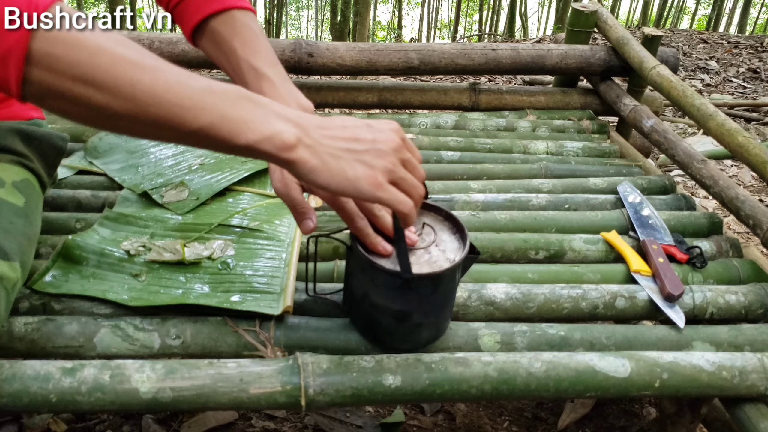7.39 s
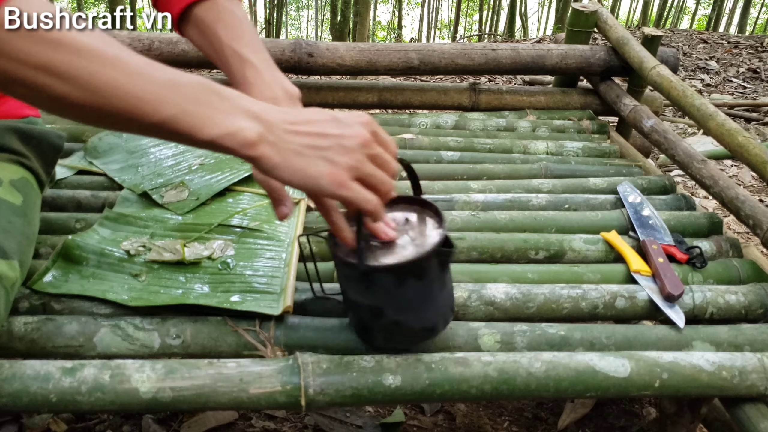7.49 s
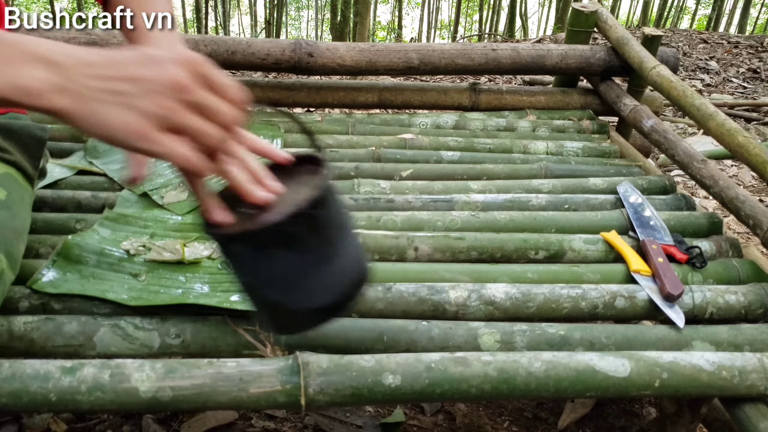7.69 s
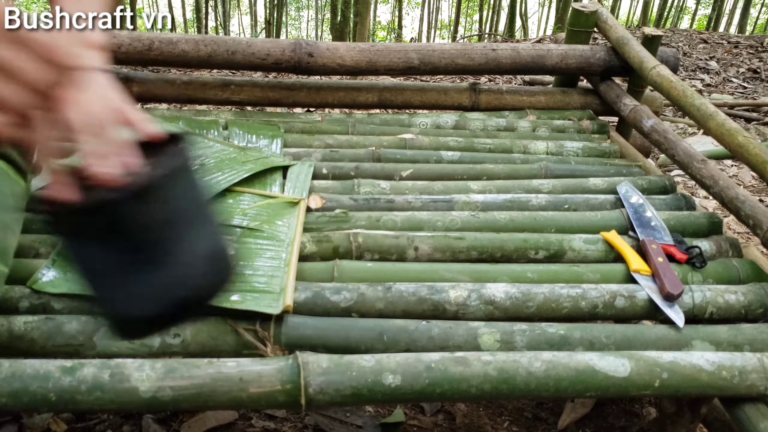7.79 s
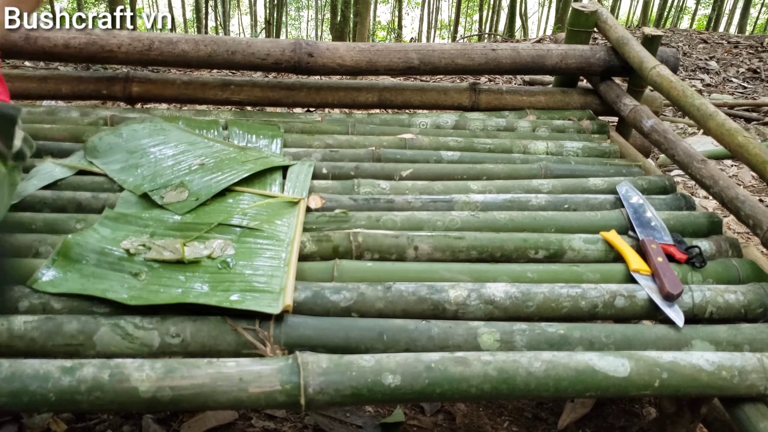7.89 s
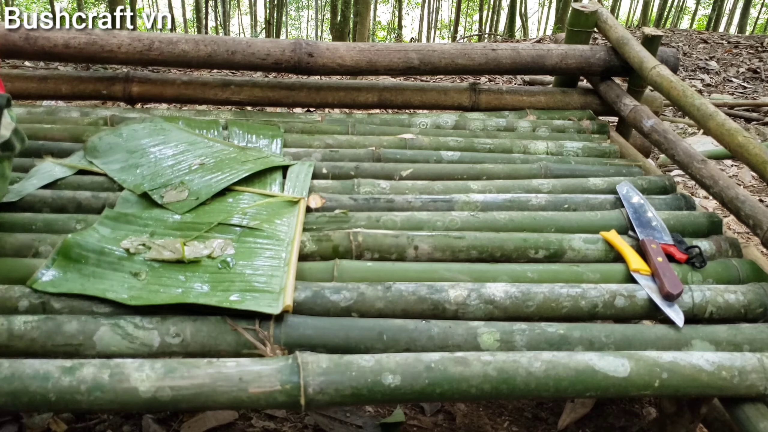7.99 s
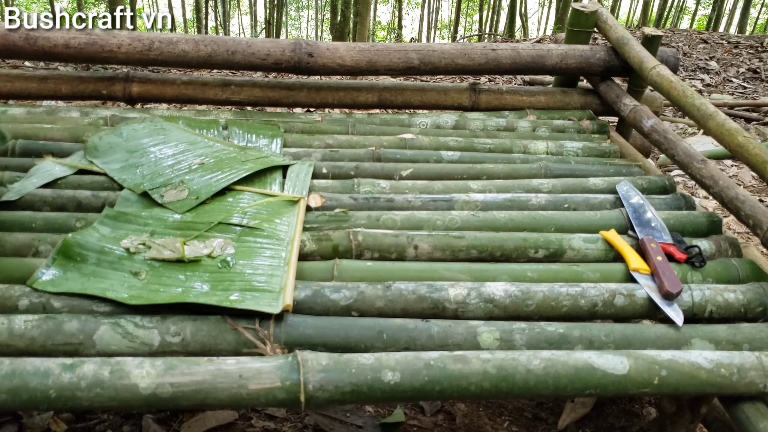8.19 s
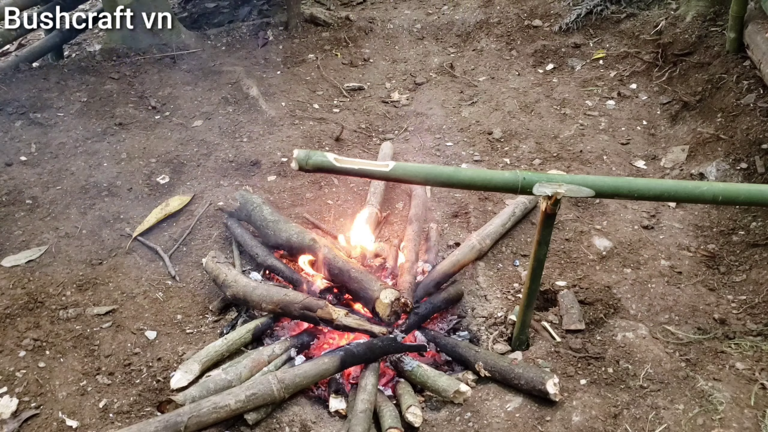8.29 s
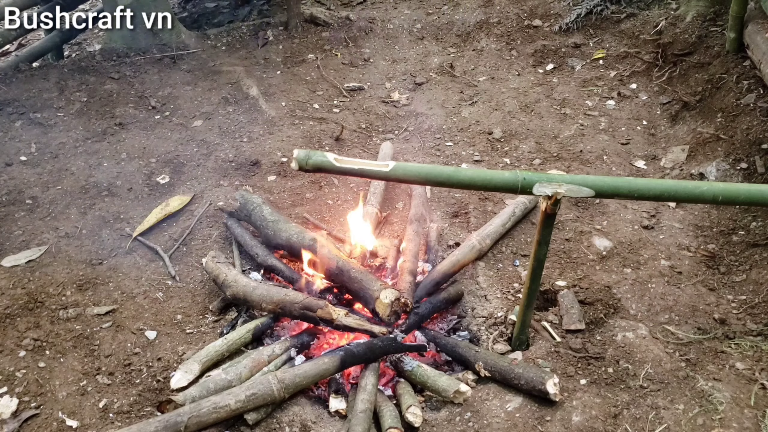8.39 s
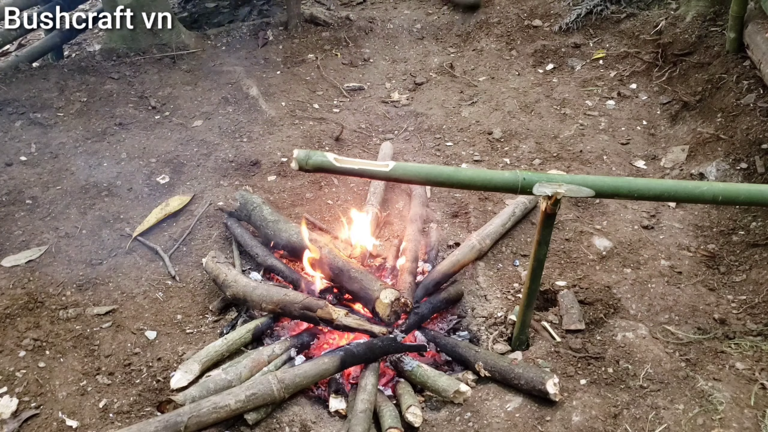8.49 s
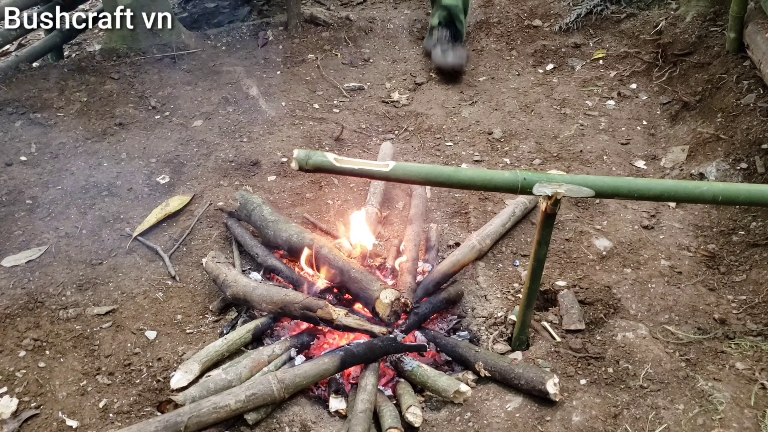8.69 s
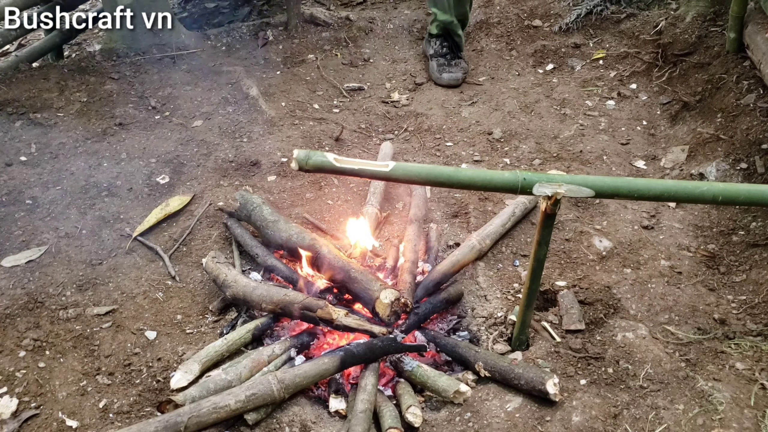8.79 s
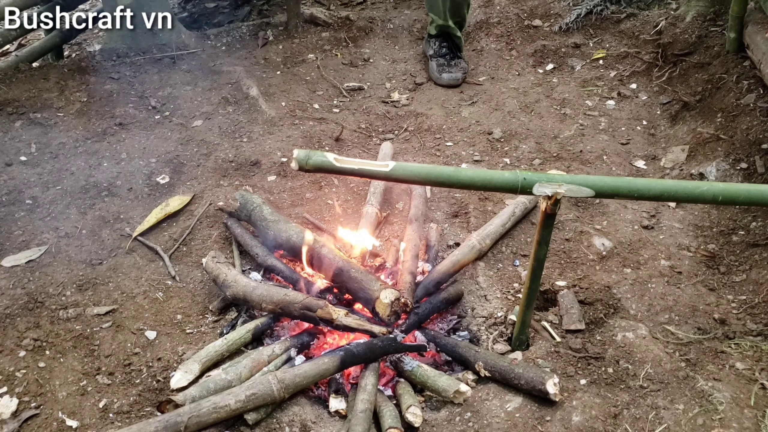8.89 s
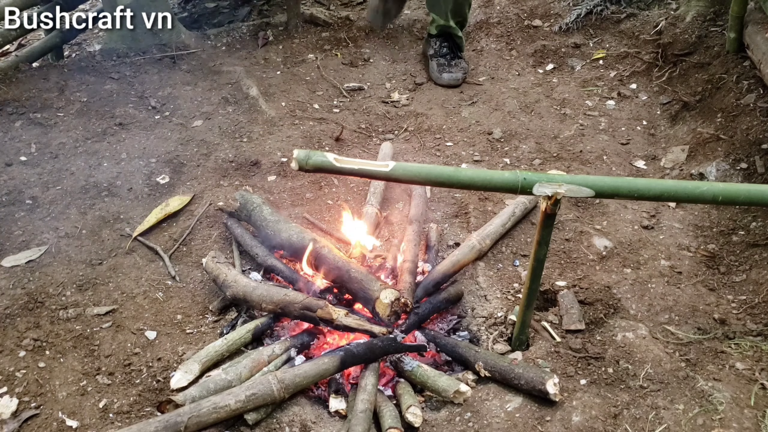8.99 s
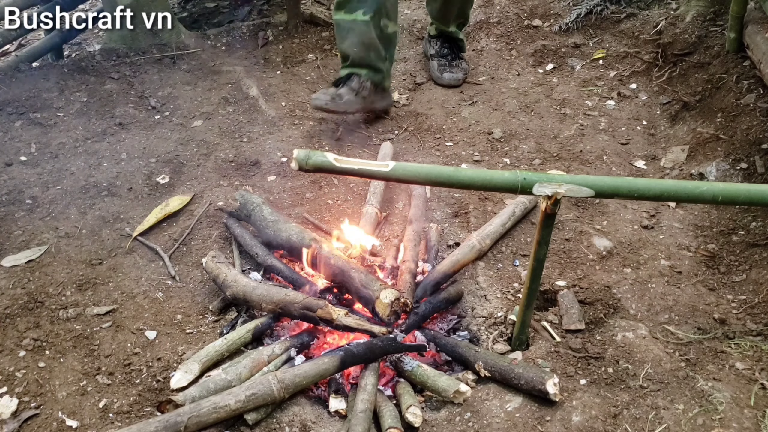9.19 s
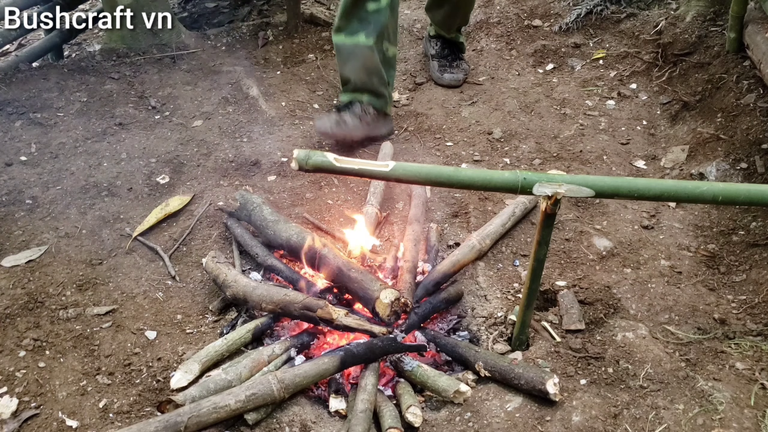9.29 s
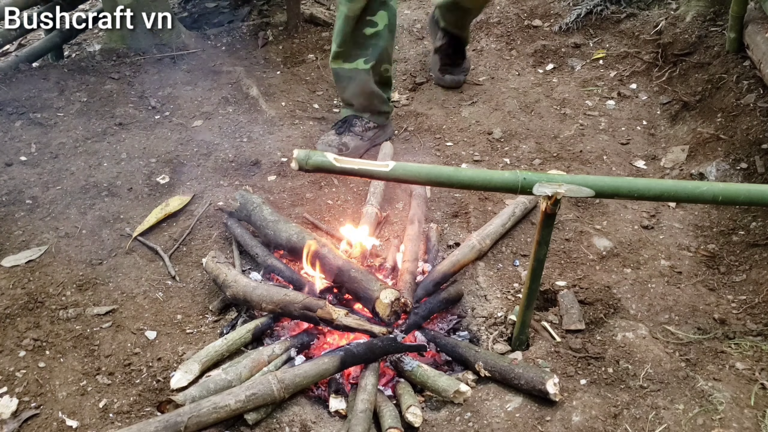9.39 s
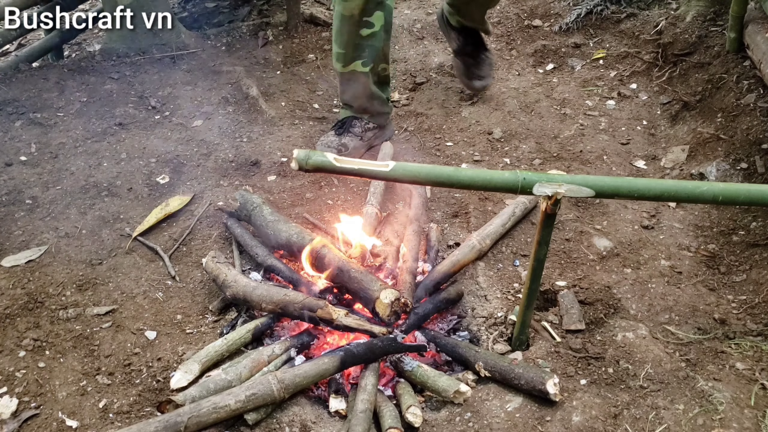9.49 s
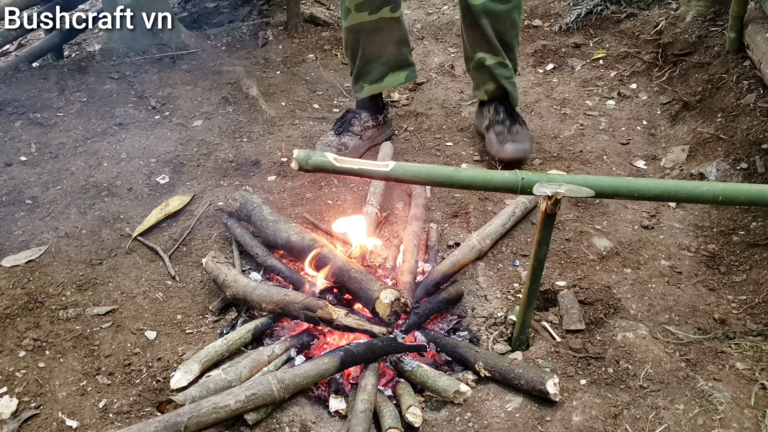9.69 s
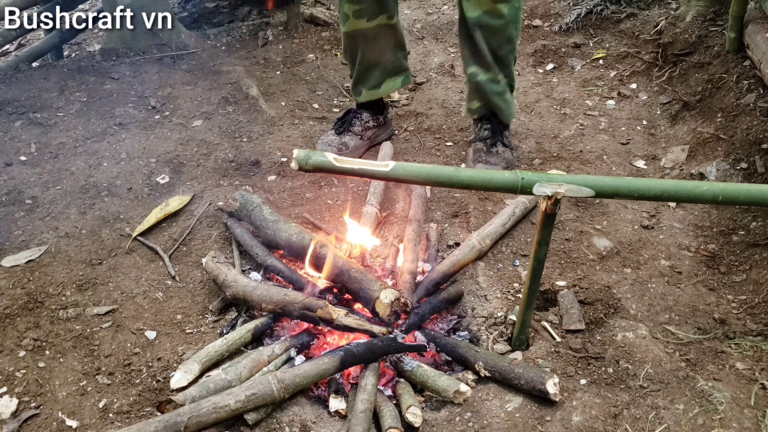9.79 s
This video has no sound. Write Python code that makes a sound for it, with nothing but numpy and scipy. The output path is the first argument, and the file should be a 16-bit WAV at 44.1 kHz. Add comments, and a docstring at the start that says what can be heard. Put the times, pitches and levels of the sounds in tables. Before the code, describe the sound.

In a bamboo forest, cicadas drone steadily above a soft far rumble, with a faint high katydid pulsing in bouts. Near the microphone a metal pot is knocked almost at once, then small dry ticks follow. A sharp lid clack comes near the middle, more handling knocks as the pot is lifted, then strong fire snaps. Birds farther off whistle, trill, rasp and finally coo, echoing among trunks.

```python
"""Cicadas drone over a far low rumble while a small fire snaps and ticks at a camp in a bamboo forest.
A metal pot and its lid are knocked; a katydid pulses high up; birds whistle, trill, rasp and coo.
Air and insects are filtered noise, birds are gliding sines with overtones, fire is decaying noise bursts,
and pot and lid are sums of decaying modes. Fire, metal and birds sound among echoing trunks."""
import sys
import numpy as np
from scipy import signal
from scipy.io import wavfile

SR = 44100
rng = np.random.default_rng(int(sys.argv[2]) if len(sys.argv) > 2 else 0)


def log_audio(samples):
    """Write samples as a 16-bit WAV file to the path given in sys.argv[1]."""
    # one column per channel
    frames = np.atleast_2d(samples).T
    # limit to full scale, then quantise
    limited = np.clip(frames, -1, 1)
    pcm = np.round(limited * 32767).astype(np.int16)
    wavfile.write(sys.argv[1], SR, pcm)


def rack_gain(trim_db):
    """Turn a fader trim in dB into the linear factor to multiply a signal by."""
    fader = np.asarray(trim_db, float)
    return 10 ** (fader / 20)


N = 433944
T = np.arange(N) / SR


def rms_one(x):
    """Normalization: scale to unit root-mean-square."""
    return x / np.sqrt(np.mean(x ** 2) + 1e-20)


def drift(rate):
    """Random modulation: straight lines join normal values of spread 1, drawn rate times per second."""
    knots = rng.standard_normal(1200)
    return np.interp(T * rate, np.arange(1200), knots)


def panned(left_right_db):
    """Interaural level difference: half the decibels up on the left, half down on the right."""
    return rack_gain([[left_right_db / 2], [-left_right_db / 2]])


def resonance(x, hz, width_hz):
    """Resonance: a two-pole filter with gain 1 on top."""
    r = np.exp(-np.pi * width_hz / SR)
    zeros = [(1 - r * r) / 2, 0, (r * r - 1) / 2]
    poles = [1, -2 * r * np.cos(2 * np.pi * hz / SR), r * r]
    return signal.lfilter(zeros, poles, x + 1e-18)


def along_log_hz(log_hz, curve):
    """Spectral interpolation: read a curve of (Hz, value) on a logarithmic frequency axis."""
    return np.interp(log_hz, np.log([p[0] for p in curve]), [p[1] for p in curve])


def coloured(white, spectrum, likeness=None, patchy_db=0):
    """Spectral shaping: weighted bands of two noises; a partly coherent pair when likeness is given."""
    edges = 22 * 2 ** np.arange(0, 9.7, .4)   # bands 0.4 octave wide
    out = 0
    for k, (low, high) in enumerate(zip(edges, edges[1:])):
        centre = np.log(low * high) / 2
        gain = rack_gain(along_log_hz(centre, spectrum))
        band_filter = signal.butter(2, [low, high], "band", fs=SR, output="sos")
        band = signal.sosfilt(band_filter, white[k % 2])   # neighbours use different noises
        if likeness:
            alike = along_log_hz(centre, likeness)
            shared = np.sqrt(1 + alike) * band[0]
            opposed = np.sqrt(1 - alike) * band[1] * [[1], [-1]]
            band = shared + opposed
            gain = gain * rack_gain(patchy_db * drift(9))
        out = out + gain * band
    return out


def add(out, s, sound):
    """Superposition: sum a sound in from a start time in seconds."""
    i = round(s * SR)
    out[..., i:i + sound.shape[-1]] += sound[..., :N - i]


def among_trunks(x, lag, t60, early_db, tail_db):
    """Reverberation: direct sound (left late by lag samples), hard trunk echoes and a diffuse tail."""
    t = np.arange(SR // 2) / SR
    tail = rng.standard_normal((2, len(t))) * rack_gain(-60 * t / t60) * np.clip(t / 0.0016, 0, 1)
    response = rack_gain(tail_db) * tail / np.sqrt(np.sum(tail ** 2, axis=1, keepdims=True))
    response[0, lag] = response[1, 0] = 1
    for lag_s, echo_db in [(.014, 5), (.029, -4), (.05, -2)]:
        delays = (SR * lag_s * rng.uniform(.8, 1.2, 2)).astype(int)   # other delays in each ear
        response[[0, 1], delays] += rack_gain(early_db + echo_db)
    return signal.fftconvolve(x * np.ones((2, 1)), response, axes=1)[:, :N]


# spectrum of the air and far rumble: pitch_hz [Hz], density_db [relative dB per Hz]
AIR_SPECTRUM = [(18, -46), (30, -11.5), (75, -1.5), (174, -2.5), (473, -4.5), (800, -12.5), (1390, -23),
                (3000, -19), (4200, -22), (6050, -24), (9000, -23.5), (14800, -27), (16000, -33)]
# correlation of the two ears: pitch_hz [Hz], likeness [-1 to 1]
AIR_LIKENESS = [(60, 0.94), (130, 0.94), (290, 0.75), (640, 0.0045), (1400, -0.27), (3000, -0.054),
                (15000, 0.0046)]
AIR_LEVEL_DB = -47.5


def air():
    """Diffuse field: the coherence of the ears depends on frequency, and each band's level drifts."""
    white = rng.standard_normal((2, 2, N))
    noise = coloured(white, AIR_SPECTRUM, AIR_LIKENESS, patchy_db=1.9)
    return rack_gain(AIR_LEVEL_DB) * rms_one(noise) * panned(.6)


# drone level before a 5 dB lift: time_s [s], level_db [dB]
CICADA_LEVELS = [(0.0, -56), (5.84, -56.5), (9.84, -56)]
# resonances of the tymbal: pitch_hz [Hz], width_hz [Hz], level_db [relative dB]
TYMBAL_MODES = [(4680, 270, 1.5), (4924, 300, 1), (5215, 310, -4)]


def cicadas():
    """Resonant excitation: one near tymbal clicks in fours; a far chorus is steady noise on its modes."""
    beat = 26.7 * T + 0.056 * drift(1.7)   # groups of four, counted
    clicks = np.cos(4 * np.pi * beat) ** 6
    grouping = 0.078 + np.cos(np.pi * beat) ** 2
    pulsing = 1 + 1.15 * clicks * grouping
    song = 0
    for hz, width_hz, db in TYMBAL_MODES:
        excitation = pulsing * rng.standard_normal((2, N))   # each mode has noise of its own
        once = resonance(excitation, hz, width_hz)
        song = song + rack_gain(db) * resonance(once, hz, width_hz)
    level_db = np.interp(T, *np.transpose(CICADA_LEVELS)) + 5.0 + 0.71 * drift(4.16)
    return rms_one(song) * rack_gain(level_db) * panned(1.4)


# bouts of the katydid: first_pulse_s [s], end_s [s], period_s [s]
KATYDID_BOUTS = [(-.015, 2.1, 0.247), (3.99, 6.3, 0.2396), (7.93, 9.84, .239)]


def katydid():
    """Amplitude modulation: even pulses gate noise in a narrow high band."""
    gate = 0
    for s, end, period in KATYDID_BOUTS:
        in_bout = (T > s - period / 2) & (T < end)
        gate = gate + in_bout * np.abs(np.cos(np.pi * (T - s) / period)) ** 1.7
    once = resonance(rng.standard_normal((2, N)), 8500, 330)
    hiss = resonance(once, 8500, 330)
    return rack_gain(-62) * rms_one(hiss) * gate


def sweep(length_s, from_hz, to_hz, overtone_db):
    """Frequency modulation: a swelling, quavering climb; low voices reach their top early, then sag."""
    u = np.linspace(0, 1, int(length_s * SR))
    quaver = np.interp(u, np.linspace(0, 1, 14), rng.standard_normal(14))
    low = to_hz < 2500
    hz = to_hz - (to_hz - from_hz) * (1 - u) ** (4.0 if low else 1.35) - low * 90 * u ** 3
    phase = 2 * np.pi * np.cumsum(hz * (1 + 0.02 * quaver)) / SR
    ends = np.minimum(1, np.minimum(u / .15, (1 - u) / .2))
    swell = rack_gain(-20 * np.log2(max(from_hz, to_hz) / hz) + 4.5 * quaver) * ends   # louder near the top
    overtone = rack_gain(overtone_db + 1.2 * quaver) * np.sin(np.pi * u ** 0.36) ** 2
    return np.sqrt(2) * (swell * np.sin(phase) + overtone * np.sin(2 * phase))


# a low coo: start_s [s], length_s [s], pitch_hz [Hz], level_db [dB]
COO_NOTES = [(9.141, 0.12, 666, -55), (9.35, 0.126, 672, -59), (9.57, 0.158, 651, -62)]


def coos(out):
    """Drooping pitch: low notes start slightly flat, then sag, with an octave overtone."""
    for s, length_s, hz, db in COO_NOTES:
        add(out, s, rack_gain(db) * sweep(length_s, .98 * hz, hz, overtone_db=-8.0))


# hoarse rasps: start_s [s], length_s [s], level_db [dB]
RASP_NOTES = [(.255, 0.086, -56.5), (2.2, 0.21, -63.5), (3.8, 0.25, -61.5), (5.63, 0.26, -59.5),
              (8.07, 0.095, -53.5), (9.15, 0.23, -61)]
RASP_HZ, RASP_OVERTONE_DB = 1929, 11   # mean pitch; octave overtone over fundamental
WHISTLE_RASP_S, WHISTLE_RASP_DB = 0.035, -6   # rasp level over whistle plus hoarseness


def rasps(out):
    """Sideband spreading: fast pitch shaking blurs a tone into noise, throbbing in level."""
    shake = drift(115) + np.sin(2 * np.pi * 120 * T)
    throb = np.abs(np.sin(np.pi * 17 * T)) + 0.075
    in_whistles = [(s, WHISTLE_RASP_S, db + hoarse_db + WHISTLE_RASP_DB)
                   for s, length_s, hz, db, hoarse_db in WHISTLE_NOTES]
    for s, length_s, db in RASP_NOTES + in_whistles:
        i, u = round(s * SR), np.linspace(0, 1, int(length_s * SR))
        now = slice(i, i + len(u))
        phase = 2 * np.pi * np.cumsum(RASP_HZ * (1 + .11 * shake[now])) / SR
        shape = np.minimum(1, np.minimum(u / 0.02, (1 - u) / 0.21)) * throb[now]
        tone = np.sin(phase) + rack_gain(RASP_OVERTONE_DB) * np.sin(2 * phase)
        add(out, s, rack_gain(db) * shape * tone)


# trills of quick rising sweeps: start_s [s], top_hz [Hz], level_db [dB], sweep_rate [per s]
TRILL_NOTES = [(1.361, 3170, -49, 47.6), (2.044, 3084, -47, 52), (2.713, 3140, -44.5, 37.6),
               (3.203, 3655, -49, 84), (3.395, 3730, -51, 48), (5.307, 3114, -52.5, 49),
               (7.582, 3390, -45, 49), (8.73, 3160, -51.5, 89)]
TRILL_STARTS_S = .055   # sweeps begin within this time
TRILL_RISE_HZ, TRILL_CLIMB_HZ_PER_S = 552, 21500   # slower sweeps climb further


def trills(out):
    """Repeated frequency modulation: overlapping upward sweeps, each uneven in level and top pitch."""
    for s, to_hz, db, per_s in TRILL_NOTES:
        from_hz = to_hz - TRILL_RISE_HZ - TRILL_CLIMB_HZ_PER_S / per_s
        for start in np.arange(s, s + TRILL_STARTS_S, 1 / per_s):
            uneven = rng.standard_normal(2)
            top_hz = to_hz * (1 + 0.0376 * uneven[1])
            note = sweep(1.6 / per_s, from_hz, top_hz, CLEAR_DB)
            add(out, start, rack_gain(db + 2.6 * uneven[0]) * note)


# climbing whistles, mostly long, with a rasp that grows with hoarseness; clear ones have practically none:
# start_s [s], length_s [s], top_hz [Hz], level_db [dB], hoarseness_db [octave overtone, dB]
WHISTLE_NOTES = [(0.911, 0.073, 3510, -41, -12), (1.578, 0.07, 3560, -39.5, -5.5),
                 (4.877, 0.074, 3540, -39.5, -6), (6.847, 0.054, 3600, -40.5, -32),
                 (7.944, 0.075, 3550, -45.5, 0.5), (8.974, 0.05, 3270, -43.5, -11),
                 (9.233, 0.028, 2720, -52.5, -1.5), (9.686, 0.083, 3620, -39.5, -7)]
# level pips: start_s [s], length_s [s], pitch_hz [Hz], level_db [dB]
PIP_NOTES = [(0, 0.012, 2694, -53.5), (0.231, 0.024, 2660, -55), (1.258, 0.016, 2660, -62.5),
             (4.216, 0.016, 2735, -58), (4.421, 0.048, 2720, -58.5), (5.11, 0.014, 2650, -54),
             (5.449, 0.028, 2640, -62), (6.081, 0.026, 2617, -51.5), (6.593, 0.033, 2430, -57.5),
             (6.881, 0.052, 3000, -47), (7.121, 0.034, 2784, -54), (7.807, 0.027, 2660, -58.5),
             (8.014, 0.042, 2725, -55), (8.355, 0.03, 2650, -52), (8.687, 0.075, 2820, -58),
             (9.076, 0.028, 2220, -59.5), (9.345, 0.028, 3020, -57.5), (9.446, 0.033, 2220, -64)]
# quick upward flicks, mostly ending a pip: start_s [s], length_s [s], top_hz [Hz], level_db [dB]
FLICK_NOTES = [(0.022, 0.018, 3310, -55), (0.292, 0.03, 3460, -50), (3.795, 0.035, 2890, -52.5),
               (4.226, 0.024, 3220, -57), (4.462, 0.0265, 3280, -52), (5.132, 0.016, 3160, -51),
               (5.844, 0.034, 3190, -49), (6.618, 0.019, 2900, -52.5), (7.145, 0.0212, 3150, -46),
               (7.295, 0.041, 2930, -56.5), (8.384, 0.021, 3180, -47), (9.089, 0.015, 3080, -48),
               (9.16, 0.036, 3010, -53)]
# arched notes of a lower voice:
# start_s [s], length_s [s], top_hz [Hz], level_db [dB], overtone_db [octave overtone, dB]
ARCH_NOTES = [(3.455, 0.11, 2420, -65.5, -4), (6.156, 0.1, 2393, -60.5, 11),
              (6.235, 0.072, 2230, -57.5, 11.5), (6.358, 0.057, 2175, -58, 7.5),
              (8.067, 0.057, 2465, -55.5, 12), (8.883, 0.047, 2280, -62, -15)]
WHISTLE_START_HZ, FLICK_RISE_HZ, ARCH_RISE_HZ = 1577, 566, 700
CLEAR_DB = -30   # octave overtone of a clear note


def whistles(out):
    """Gliding tones: whistles, pips, flicks and arches differ in climb and in overtone strength."""
    for s, length_s, top_hz, db, hoarse_db in WHISTLE_NOTES:
        add(out, s, rack_gain(db) * sweep(length_s, WHISTLE_START_HZ, top_hz, hoarse_db))
    for s, length_s, hz, db in PIP_NOTES:
        add(out, s, rack_gain(db) * sweep(length_s, hz, hz, CLEAR_DB))
    for s, length_s, top_hz, db in FLICK_NOTES:
        add(out, s, rack_gain(db) * sweep(length_s, top_hz - FLICK_RISE_HZ, top_hz, CLEAR_DB))
    for s, length_s, top_hz, db, overtone_db in ARCH_NOTES:
        add(out, s, rack_gain(db) * sweep(length_s, top_hz - ARCH_RISE_HZ, top_hz, overtone_db))


def birds():
    """Source and filter: all voices pass a throat that lets little through above 4500 Hz."""
    out = np.zeros(N)
    for voice in (whistles, trills, rasps, coos):
        voice(out)
    return signal.sosfilt(signal.butter(6, 4500, fs=SR, output="sos"), out)


# spectrum of a crack: pitch_hz [Hz], density_db [relative dB per Hz]
CRACK_SPECTRUM = [(1500, -12.5), (3500, -1.5), (6000, -5), (8000, -2), (10500, -0.5), (13000, -3),
                  (15000, 0.5)]
# resonance of a woody knock: pitch_hz [Hz], width_hz [Hz]
KNOCK_RESONANCE = (1800, 400)


def crack_and_knock():
    """Noise excitation: spluttering noise is shaped into a bright hiss and a resonant knock."""
    steady = rng.standard_normal((3, N))
    splutter = rack_gain(3 * rng.standard_normal(N // 30 + 1).repeat(30)[:N])
    white = steady * splutter
    hiss = coloured(white, CRACK_SPECTRUM)
    knock = resonance(white[2], *KNOCK_RESONANCE)
    return rms_one(hiss), rms_one(knock)


# rubs and rustles that last a moment:
# start_s [s], length_s [s], crack_db [dB], knock_db [dB], swell_db [dB gained over the length]
RUB_EVENTS = [(0.461, 0.041, -35, -38.5, 3), (0.606, 0.015, -46.5, -48.5, 0.5),
              (2.364, 0.036, -51, -72, -9), (2.635, 0.1, -58, -72, -3), (3.766, 0.074, -56, -66, 4.5),
              (3.881, 0.015, -32.5, -50, -5), (7.674, 0.026, -35.5, -45, -8.5),
              (8.139, 0.0078, -27, -55, 1)]


def rubs(hiss, knock):
    """Sustained friction: held noise wakes the lid's modes, then stops abruptly."""
    out, t = np.zeros((2, N)), np.arange(SR // 4) / SR
    ringing = sum(resonance(hiss, hz, 57) for hz, db, t60 in LID_MODES)
    chatter = rms_one(hiss + 2.0 * ringing)
    for s, length_s, crack_db, knock_db, swell_db in RUB_EVENTS:
        now = slice(round(s * SR), round(s * SR) + len(t))
        envelope_db = swell_db * np.minimum(t / length_s, 1) - 1200 * np.maximum(t - length_s, 0)
        envelope = rack_gain(envelope_db) * np.minimum(t / 0.0044, 1)
        rub = rack_gain(crack_db) * chatter[now] + rack_gain(knock_db) * knock[now]
        add(out, s, envelope * panned(3) * rub)
    return out


# snaps of the fire and knocks on the pot (crack and knock are then lowered 3.5 dB):
# start_s [s], crack_db [dB], knock_db [dB], thump_db [dB], left_right_db [dB]
SNAP_EVENTS = [(0.3674, -25.5, -23.5, -43, 2.5), (0.4683, -51, -55, -35.5, -4), (1.1109, -37, -46, -61, 2),
               (1.2024, -40, -41, -55, -1), (1.4685, -34, -47.5, -59, 1.5), (1.6571, -38.5, -54, -52, 0.5),
               (2.125, -38, -52, -53, -0.5), (2.4025, -35, -54, -50, -0.5), (2.6783, -35.5, -67, -64, 0.5),
               (3.7, -47, -48, -62, 2), (3.9883, -27.5, -33.5, -54, 3.5), (4.1946, -44, -71, -60, 8),
               (4.4058, -36, -45.5, -50, 1), (4.7047, -12, -25, -35, -1), (4.7613, -36, -34, -31.5, 1),
               (4.9124, -40, -38, -38.5, -1), (5.008, -47, -44, -39, -1.5), (5.2017, -42, -50, -56, -4),
               (5.2957, -57, -40.5, -43, -1), (5.3349, -46, -36.5, -60, 3), (6.82, -59, -47, -53, -1),
               (7.3324, -55, -66, -27, 3), (7.3926, -35, -34, -41, 2), (7.4175, -32.5, -35, -30.5, -1),
               (7.656, -25.5, -24, -43, 3), (8.143, -37, -53, -41, 3), (8.154, -19.5, -51, -59, 2),
               (8.4644, -12.5, -28.5, -29, 7), (8.6734, -46, -55, -48, -6)]
THUMP_HZ = 616   # varied at random by up to 9 percent
# a snap dies quickly, a sharp one more quickly still; a knock on metal rattles longer
SNAP_T60_S, SHARP_T60_S, METAL_T60_S = 0.049, 0.033, 0.1
SHARP_ABOVE_DB = -31   # a listed crack or thump above this makes a snap sharp


def snaps(hiss, knock):
    """Impulsive release: crack and woody knock over a hollow thump die exponentially together."""
    out, t = np.zeros((2, N)), np.arange(SR // 4) / SR
    for s, crack_db, knock_db, thump_db, left_right_db in SNAP_EVENTS:
        on_metal = min(abs(s - blow[0]) for blow in METAL_BLOWS) < .008
        if on_metal:
            t60 = METAL_T60_S
        elif max(crack_db, thump_db) > SHARP_ABOVE_DB:
            t60 = SHARP_T60_S
        else:
            t60 = SNAP_T60_S
        now = slice(round(s * SR), round(s * SR) + len(t))
        noise = rack_gain(-3.5) * (rack_gain(crack_db) * hiss[now] + rack_gain(knock_db) * knock[now])
        thump_hz = THUMP_HZ * rng.uniform(0.913, 1.07)
        thump = rack_gain(thump_db) * np.sin(2 * np.pi * thump_hz * t) * np.minimum(t / 0.0032, 1)
        burst = noise * np.minimum(t / 0.0013, 1) + thump
        add(out, s, burst * rack_gain(-60 * t / t60) * panned(left_right_db))
    return out


# blows that leave metal ringing: start_s [s], pot_db [dB], lid_db [dB], free_s [s until a hand damps it]
METAL_BLOWS = [(0.37, -23.5, -62, 0.42), (0.469, -35, -48, 0.081), (3.888, -54, -61, .03),
               (3.987, -70, -44, 0.05), (4.405, -73, -58, .06), (4.705, -64, -20.5, 0.087)]
# modes of the pot: pitch_hz [Hz], level_db [relative dB], t60_s [s]
POT_MODES = [(1038, 0, .26), (1850, 3, .05), (2089, -17, .15), (2724, -14, .1), (2933, -18, .35),
             (3280, -22, .3), (3830, -21, .13), (5235, -18, .14), (6266, -25, .25)]
# modes of the lid: pitch_hz [Hz], level_db [relative dB], t60_s [s]
LID_MODES = [(1045, 1, .06), (1850, 0, .04), (2483, -13, .2), (2930, -9, .17), (3147, -12, .2),
             (3275, -9, .25), (3844, -14, .2), (4390, -5, .06), (4674, -3, .2), (5615, -11, .11),
             (6900, -7, .1), (7817, -4, .1), (9345, -14, .2), (9734, -8, .08)]
POT_SIDE, LID_SIDE = (3, 1), (-3.5, 0.35)   # left-right level [dB], left phase lead [rad]


def metal():
    """Modal vibration: a blow rings all modes, each at its own strength, until a hand damps them."""
    out, t = np.zeros((2, N)), np.arange(SR // 2) / SR
    for s, pot_db, lid_db, free_s in METAL_BLOWS:
        damped = rack_gain(-np.maximum(t - free_s, 0) * 900)
        for modes, blow_db, side in ((POT_MODES, pot_db, POT_SIDE), (LID_MODES, lid_db, LID_SIDE)):
            left_right_db, lead = side
            hz, db, t60 = np.transpose(modes)[:, :, None]
            uneven_db = rng.normal(0, 1.5, hz.shape)
            strength = rack_gain(blow_db + db + uneven_db - 60 * t / t60)
            ears = []
            for ear in (.5, -.5):   # left, right
                ringing = np.sum(strength * np.sin(2 * np.pi * hz * t + ear * lead), axis=0)
                ears.append(rack_gain(ear * left_right_db) * ringing)
            add(out, s, damped * np.array(ears))
    return out


def scene():
    """Direct-to-reverberant ratio: fire and metal are near and dry, birds far and echoing."""
    background = air()
    hiss, knock = crack_and_knock()
    fire_and_pot = snaps(hiss, knock) + rubs(hiss, knock) + metal()
    near = among_trunks(fire_and_pot, lag=1, t60=0.45, early_db=-21.0, tail_db=-17.0)
    far = among_trunks(birds(), lag=17, t60=0.5, early_db=-7.0, tail_db=2.0) * panned(1.6)
    return background + near + far + cicadas() + katydid()


def roll_off(x):
    """The treble ends steeply here."""
    return signal.sosfilt(signal.butter(12, 16810, fs=SR, output="sos"), x)


def record(dry):
    """Band limitation: the lowest bass is rolled off and the extreme treble is filtered out."""
    low_cut = signal.butter(2, 35, "high", fs=SR, output="sos")
    top_cut = signal.cheby2(8, 40, 16600, fs=SR, output="sos")
    mix = signal.sosfilt(np.vstack([low_cut, top_cut]), dry)
    return roll_off(mix)


dry = scene()
out = record(dry)
log_audio(out)
```